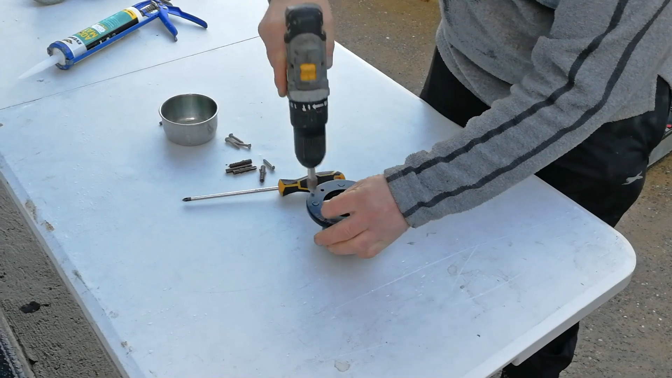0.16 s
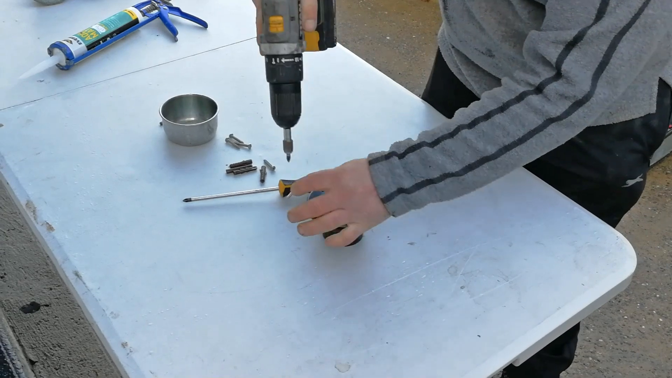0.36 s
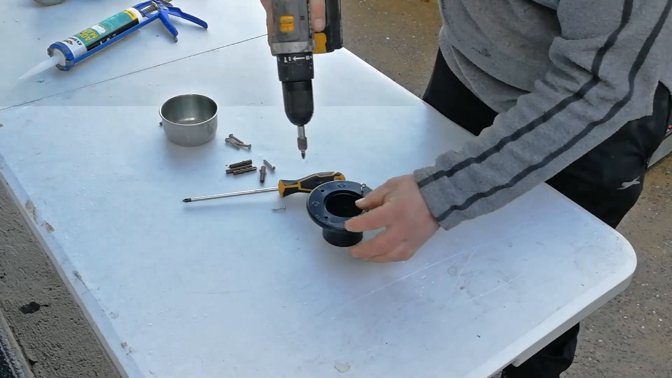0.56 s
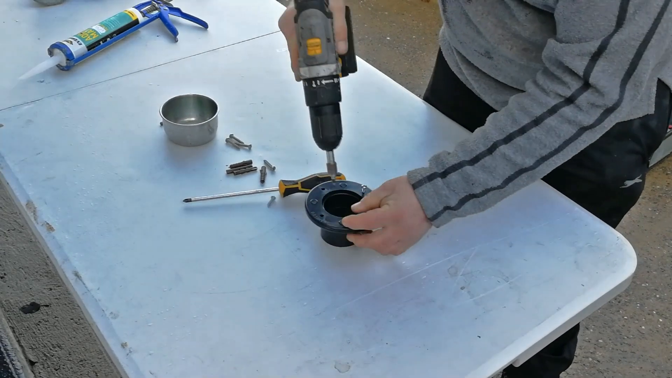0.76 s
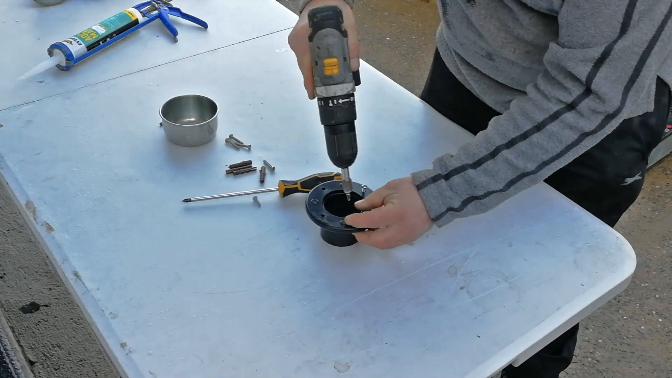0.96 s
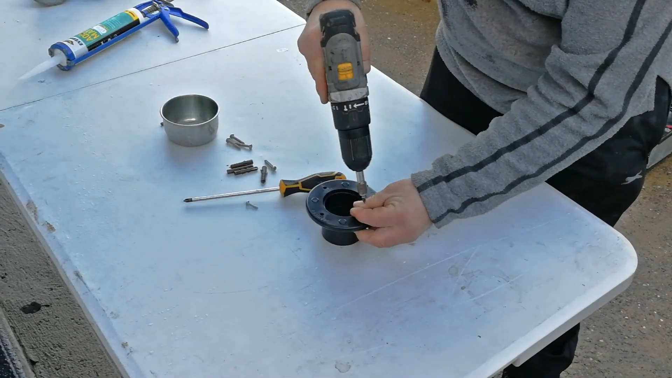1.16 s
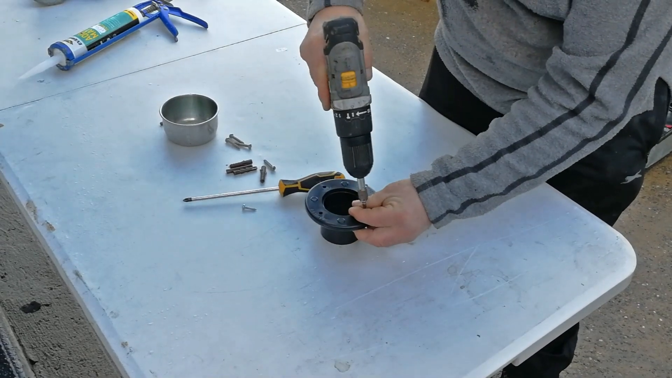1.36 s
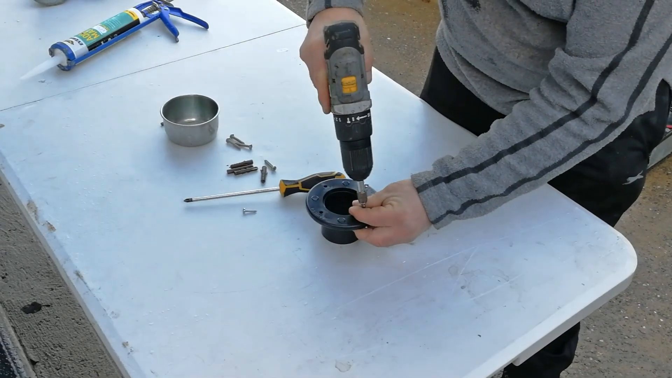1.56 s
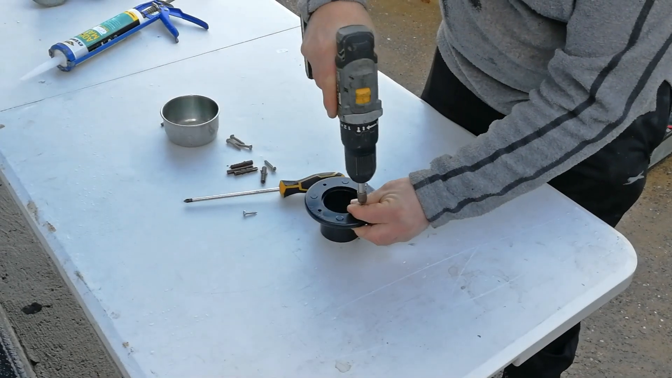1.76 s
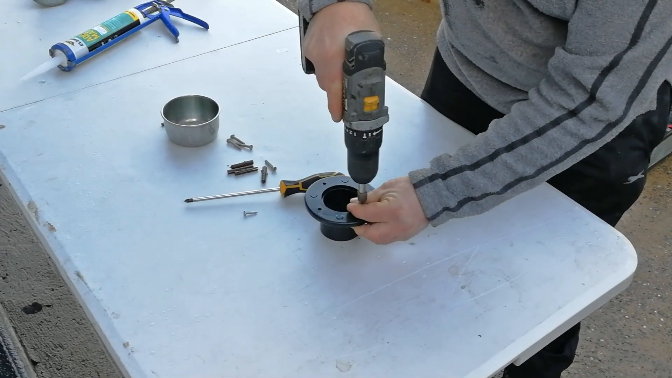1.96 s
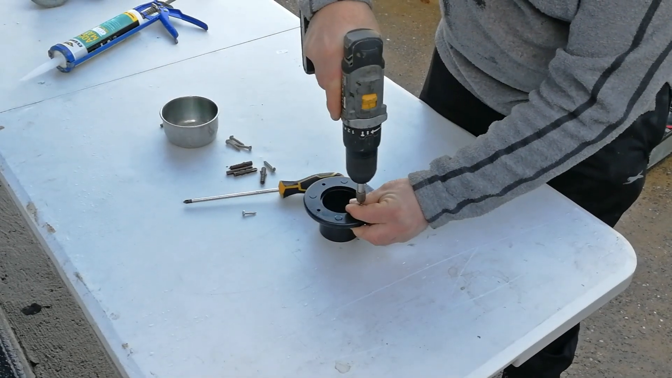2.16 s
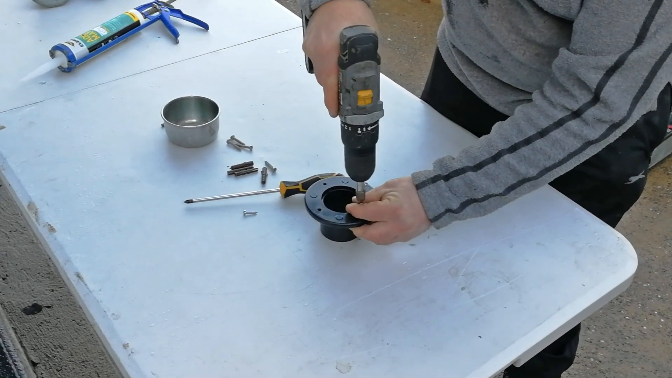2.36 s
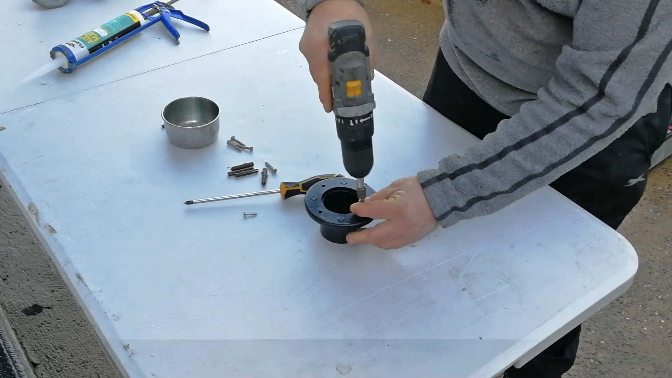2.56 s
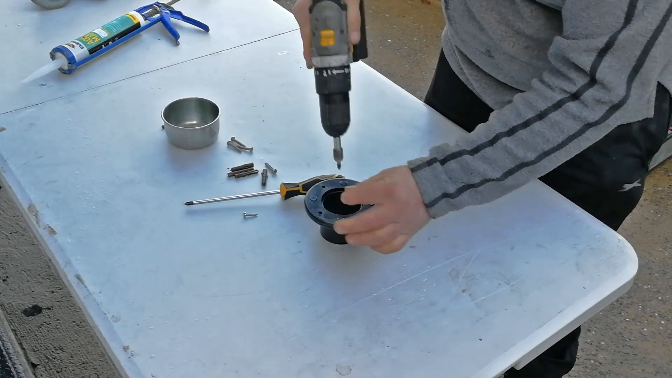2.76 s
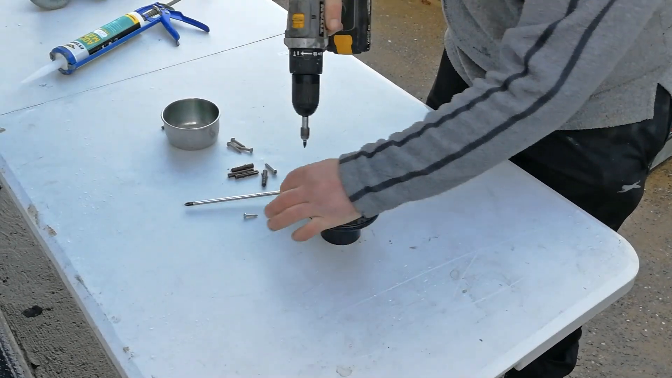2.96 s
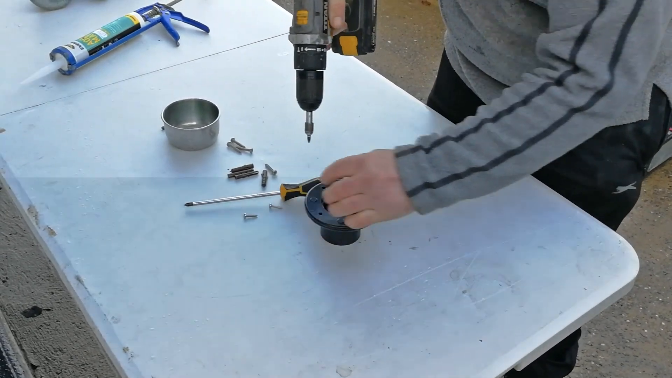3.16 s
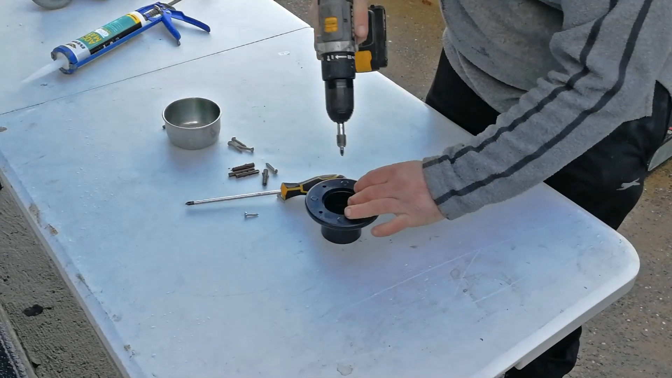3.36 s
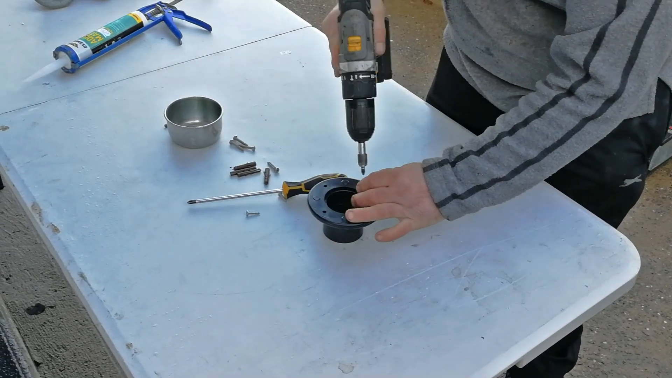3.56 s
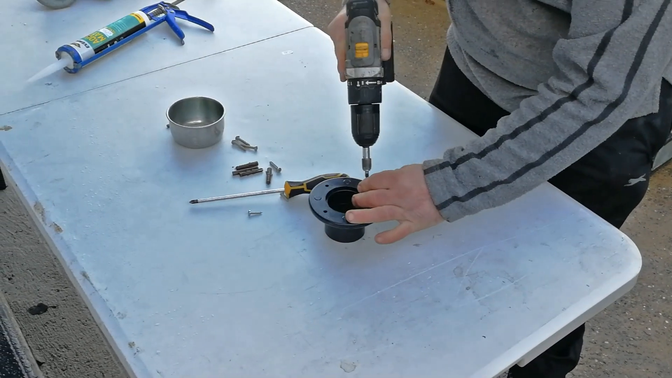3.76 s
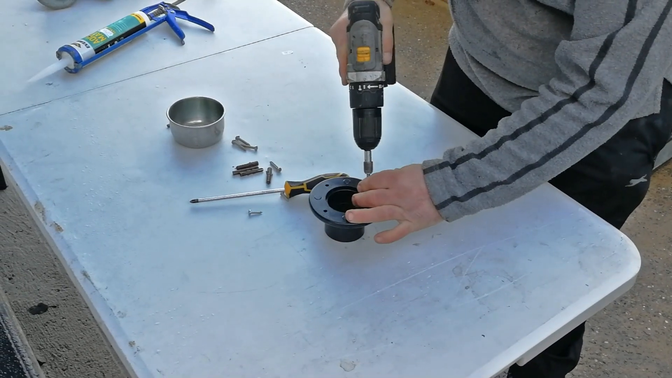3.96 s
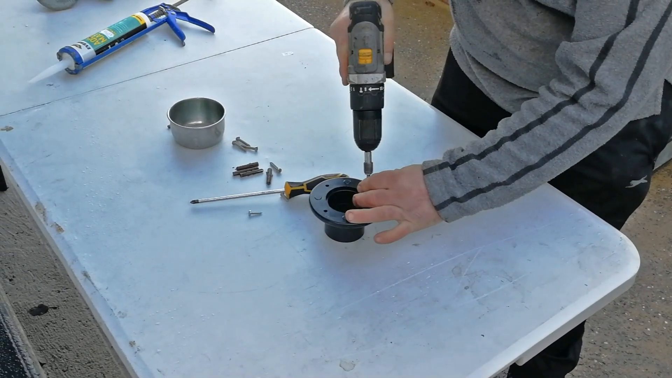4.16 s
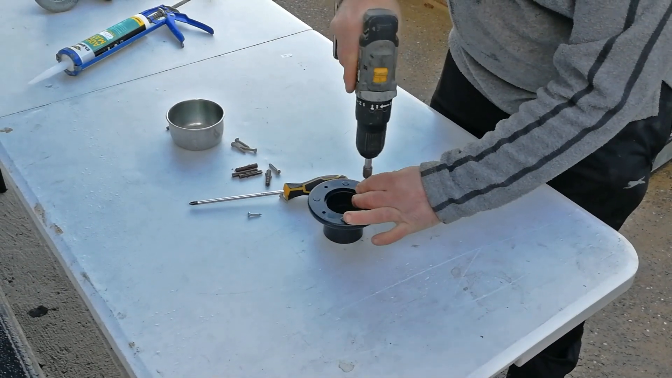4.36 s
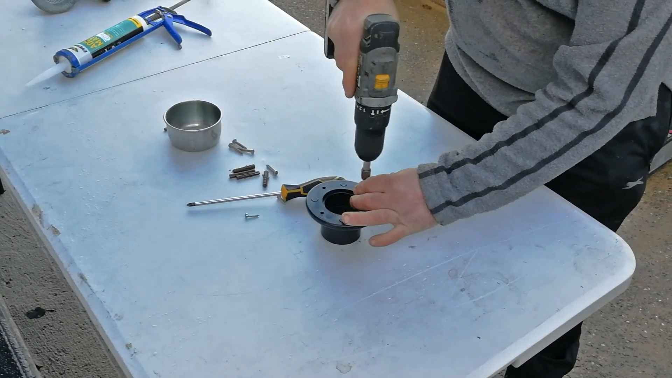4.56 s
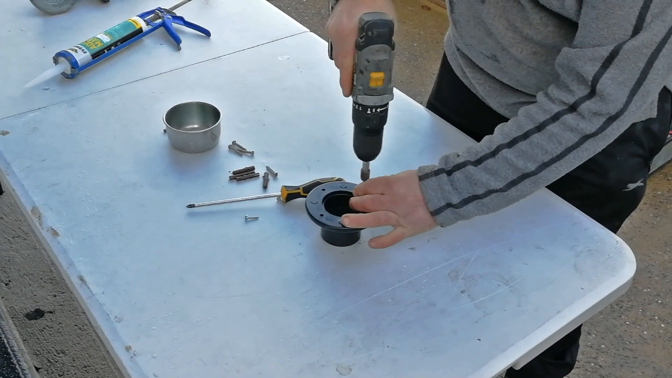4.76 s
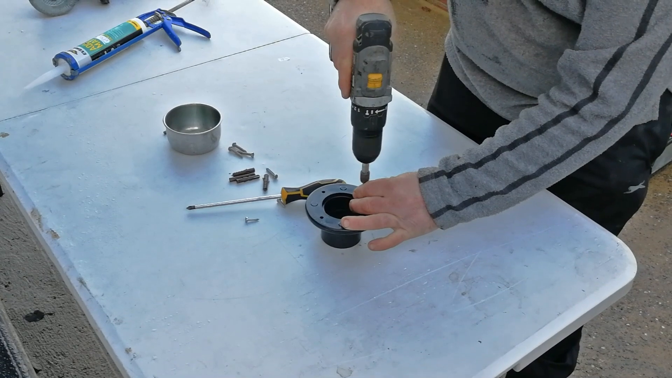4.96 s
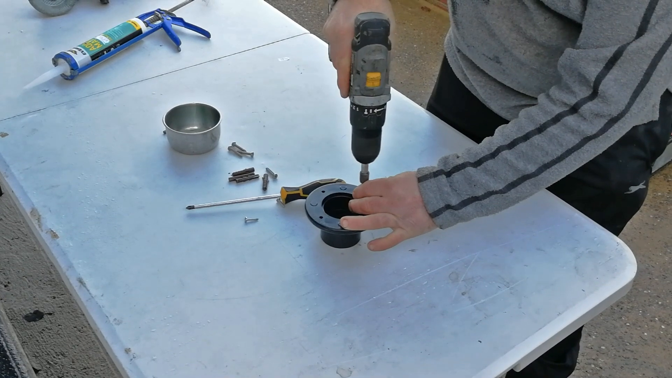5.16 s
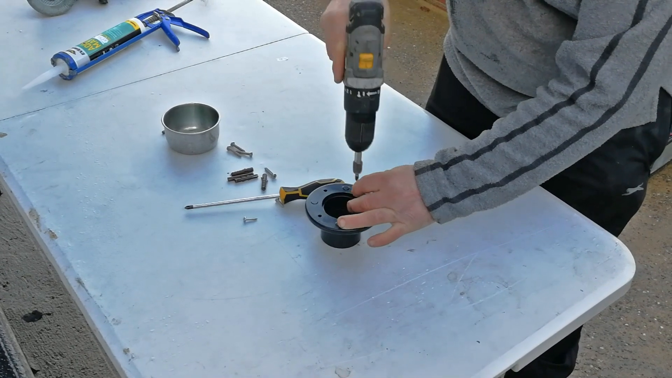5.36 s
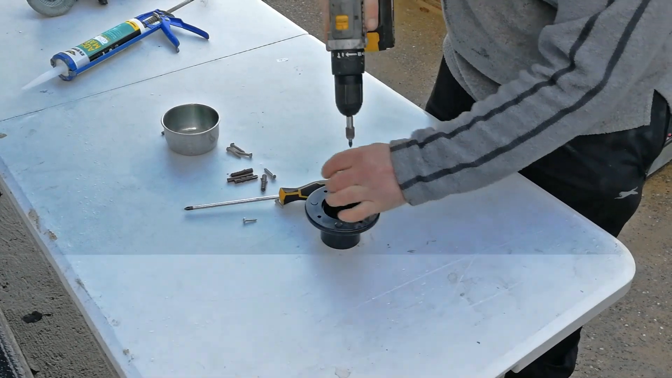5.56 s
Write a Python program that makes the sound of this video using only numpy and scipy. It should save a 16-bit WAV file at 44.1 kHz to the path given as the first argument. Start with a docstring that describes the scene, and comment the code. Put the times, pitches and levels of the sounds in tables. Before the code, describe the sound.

Close stereo recording at a plastic folding table outdoors. A cordless drill run ends with quick clunks, then a hard plastic fitting clacks and bounces. Steel ticks precede a rattling, whining drill burst of under a second. More plastic clacks follow, then bit taps with hollow table thumps and a second burst, stopping with clunks over faint distant traffic.

```python
"""A cordless drill-driver backs screws out of a plastic fitting on a folding plastic table, outdoors.
Drill: noise modulated by gear contact excites the housing, and shaft orders whine above until the trigger is let go.
The clunks, bit and fitting are decaying noise bursts coloured by resonances; scuffs are swelling noise bands.
The hollow table top booms as a sum of damped modes. Late reflections of the yard follow the blows and the drill;
behind all lies the filtered noise of distant traffic and open air."""
import sys
import numpy as np
from scipy import signal
from scipy.fft import rfft, irfft
from scipy.io import wavfile
from scipy.ndimage import uniform_filter1d

SR = 44100
rng = np.random.default_rng(int(sys.argv[2]) if len(sys.argv) > 2 else 0)


def to_wav(sig):
    """Store sig (one row per channel, or 1-D mono) as 16-bit WAV at the path in sys.argv[1].

    Samples outside -1..1 are clipped; the rate is SR.
    """
    pcm = np.clip(np.atleast_2d(sig), -1, 1) * 32767
    pcm = np.round(pcm).astype(np.int16)
    wavfile.write(sys.argv[1], SR, pcm.T)  # frames by channels


N = 246959
T = np.arange(N) / SR  # time [s]

# Pulls of the trigger: (pull time [s], let-go time [s], time the screw comes free [s], level [dB],
# level change once free [dB], gear-mesh whine offset [dB], upper whine offset [dB])
TRIGGER_PULLS = [(-.6, .062, -.3, -32.5, -3.5, 6, -3), (1.718, 2.547, 2.32, -32.2, -4.4, 4, .5),
                 (4.386, 5.26, 5.02, -32.2, -3, -1, 4.5)]
# Lines of motor and gears: (multiple of motor speed [-], relative left level [dB], relative right level [dB])
SHAFT_ORDERS = [(4, -16, -14), (5, -9, -10), (6, -23, -13), (15, -7, -15), (19, -24, -20), (20, -17, -29),
                (21, -18.5, -21), (25, -15, -24), (26, -17.5, -31), (28, -20.5, -30), (30, -29, -40),
                (31, -25, -40), (33, -19.5, -35), (35, -15, -33), (36, -15.5, -37), (37, -25, -40),
                (41, -24.5, -27)]
# Hum of the motor under spin-up torque: (multiple of motor speed [-], relative level [dB])
MOTOR_HUM = [(1, -9.5), (2, -17)]
# Spectrum of the drill housing: (frequency [Hz], left level [dB], right level [dB])
HOUSING_SPECTRUM = [(150, -28, -15), (384, -17.5, -14), (726, -16, -39.5), (1074, -2.5, 0),
                    (1410, 2.5, -1.5), (1904, -10.5, 6), (2340, -5, -7), (3510, -6.5, -12),
                    (4220, -13, -19.5), (5900, -5.5, -25), (7480, -14.5, -13), (9500, -15.5, -25),
                    (12500, -19.5, -32.5), (15800, -21, -45)]
# Clunks of the spindle lock and gears: as the motor brakes, and once as the gears take up their play:
# (time [s], level [dB], ring t60 [s], relative tick level [dB])
LOCK_CLUNKS = [(.080, -34, 0.017, -8), (.1040, -29, 0.023, -24), (.1200, -35, .02, -3),
               (1.7650, -40, .02, -18), (2.5649, -30, .02, -23), (2.5941, -28.5, 0.029, -27),
               (2.6100, -40, .02, 4), (5.2806, -28.5, 0.034, -8), (5.3062, -34.5, 0.029, -20),
               (5.3207, -33, .028, -8)]
# Steel bit meeting a screw head: (time [s], level [dB], ring t60 [s])
BIT_TICKS = [(1.3595, -26, 0.011), (1.3923, -42, .012), (1.4030, -40, .01), (1.4170, -44, .01),
             (1.7272, -43.5, 0.018), (1.837, -26, 0.014), (3.42, -58, .02), (3.8932, -31.5, .014),
             (3.9589, -35, 0.015), (4.2868, -27.5, 0.018), (4.295, -39, 0.027), (4.3910, -51, .015)]
# Spectrum of the bit's ring: (frequency [Hz], left level [dB], right level [dB])
BIT_SPECTRUM = [(400, -8, 1.5), (1000, 1, -11), (2000, -7, 2), (4300, -12, -32), (6000, -2, -13),
                (7300, 1, 0), (9500, -5.5, -8), (11500, -8, -32), (16000, -16, -16)]
# Hard plastic clacks and bounces: (time [s], level [dB], ring t60 [s], treble raised and bass lowered by [dB])
PLASTIC_CLACKS = [(0.3999, -21, 0.032, -1), (0.4103, -20.5, 0.024, 2), (0.414, -28, .025, 8),
                  (0.4863, -27.5, 0.05, 0), (0.4953, -30, 0.019, 9), (.509, -33.5, 0.033, -1),
                  (0.5298, -30.5, 0.013, 1), (.6675, -40.5, 0.035, 0.5), (0.828, -51.5, .03, -4),
                  (3.0106, -19, 0.022, 2.5), (3.0170, -24.5, 0.03, -7.5), (3.0194, -21, 0.031, 3.5),
                  (3.0985, -23, 0.034, -3), (3.1283, -33.5, 0.051, -3.5)]
# Spectrum of the fitting's ring: (frequency [Hz], left level [dB], right level [dB])
FITTING_SPECTRUM = [(200, -44, -29.5), (475, -20, -24.5), (850, -5, -14), (1450, -10, -10.5),
                    (1910, -13.5, -4), (2400, -10, -11), (3110, -1, -8.5), (4000, -6.5, -17),
                    (4930, -4.5, -12), (6280, -13.5, -22), (8480, -12, -20.5), (10300, -23.5, -33),
                    (16000, -29, -35)]
# Fitting scuffing the table, bit rasping in a screw head: (time [s], level [dB], length [s], centre [Hz])
SCUFF_SLIDES = [(.022, -46, 0.061, 446), (.41, -47, 0.062, 3600), (0.52, -51, 0.042, 3200),
                (1.654, -64, 0.15, 8900), (1.824, -30.5, 0.021, 1100), (1.82, -43, .09, 3000),
                (3.303, -58.5, .02, 3800), (3.318, -52.5, 0.044, 3100), (3.896, -46.5, 0.024, 3000),
                (4.285, -38, 0.074, 372), (4.295, -38, 0.053, 2140), (4.468, -33, 0.032, 520),
                (4.462, -40, .08, 2400)]
# Weight of the drill landing on the table: (time [s], relative level [dB], push length [s])
TABLE_THUMPS = [(0.026, -30, 0.0022), (1.362, -29, 0.0045), (1.829, -25, 0.0024), (3.8935, -24.5, 0.0037),
                (4.2886, -17.5, 0.0043), (4.2952, -27, 0.0028), (4.309, -21.5, 0.0029),
                (4.471, -21.5, 0.0023)]
# Screw thread catching and juddering the table: (time [s], relative level [dB], t60 [s])
THREAD_CATCHES = [(1.835, -34.5, 0.24), (1.985, -33.5, 0.21), (2.26, -39, .1), (2.335, -36.5, .13),
                  (2.39, -40.5, 0.21), (4.485, -32, 0.32), (4.762, -34, 0.43), (4.835, -37, 0.31),
                  (4.925, -35, 0.38), (5.073, -32.5, 0.29)]
# Modes of the hollow table top: (frequency [Hz], level [dB], t60 [s])
TABLE_MODES = [(117, -27, .15), (147, -3, 0.17), (206, -10, 0.11), (252.8, -10, 0.084), (304.4, -14, 0.12),
               (354, -19, 0.13), (420, -13, 0.085), (593, -19, 0.081), (654, -14, .07)]
# Spectrum of distant traffic and open air: (frequency [Hz], left level [dB], right level [dB])
AIR_SPECTRUM = [(19.8, -10.5, -9.5), (48, 0.5, 0.5), (85, -5, -4.5), (130, -5.5, -5), (219, -6.5, -6.5),
                (330, -19, -9.5), (520, -23.5, -19), (1020, -9, -15), (1940, -19.5, -15.5),
                (2760, -24.5, -31.5), (4520, -32.5, -37.5), (7000, -40, -42), (15500, -46.5, -47.5)]

FULL_SPEED_HZ, SPIN_UP_S = 353, .076  # motor turns per second; time constant of the climb
ENGAGE_S = 0.047  # the gears take up their play this long after the pull
BITE_S, IDLE_DB = 0.068, -11  # the gears start this much quieter and swell until the bit bites
BRAKE_HZ_PER_S, STOP_S = 750, 0.037  # fall of speed and Gaussian time scale of the fade after letting go
FREE_S = 0.14  # the load fades over this time as the screw leaves its thread
SPEED_DB_PER_OCTAVE = 5.5  # the gearbox is louder the faster it turns
SLOW_TILT_DB, LOAD_TILT_DB = 11, 1.5  # treble tilt at standstill, gone at full speed; tilt under full load
MESH_ORDER, UPPER_ORDER = 15, 25  # orders whose level is set for each pull
WHINE_SPEED_POWER, FREE_WHINE_DB = 9.6, -2  # growth of the whine with speed; its further drop without load
CATCH_ATTACK_S, CATCH_TOP_HZ = 0.011, 473  # a catch builds up softly, so it is dull
AIR_DB, AIR_DB_PER_S = -48, -0.46  # the far traffic slowly recedes
TOP_HZ = 16000


def drill(rattle=0.29, planet_depth=0.095, planet_ratio=.23, flutter_db=0.72, waver_db=3, wobble=.0012,
          churn_db=-1):
    """Amplitude modulation and harmonic orders: tooth contact rattles the housing, shaft multiples whine."""
    hz, load, gain, mesh_db, upper_db = trigger()
    speed = hz / FULL_SPEED_HZ
    turn = 2 * np.pi * np.cumsum(hz * (1 + wobble * walk(70))) / SR  # shaft angle [rad]

    # tooth play opens and closes with the motor shaft and with the slower planet carrier
    shaft_play = 1 + rattle * np.cos(turn)
    planet_play = 1 + planet_depth * np.cos(planet_ratio * turn)
    contact = shaft_play * planet_play * undb(flutter_db * walk(60))
    churn = unit(colour(pair(2300) * contact, HOUSING_SPECTRUM))
    tilt_db = SLOW_TILT_DB * (1 - speed) + LOAD_TILT_DB * load
    churn = undb(churn_db) * brighten(churn, tilt_db)

    whine = np.zeros((2, N))
    run_db = {MESH_ORDER: mesh_db, UPPER_ORDER: upper_db}
    for order, *ears_db in SHAFT_ORDERS:
        # the hand-held tool sways, so each line swells differently at each ear
        depth_db = waver_db / 2 if order == MESH_ORDER else waver_db
        sway_db = depth_db * np.array([walk(22.05), walk(21.83)])
        line_db = np.array(ears_db)[:, None] + sway_db + run_db.get(order, 0)
        phase = order * turn + 0.31 * walk(150) + rng.uniform(0, 2 * np.pi)
        ear_lag = np.array([[0], [order * 0.088]])  # [rad]
        whine += undb(line_db) * np.sqrt(2) * np.sin(phase - ear_lag)
    # the whine grows steeply with speed and eases without load
    whine *= speed ** WHINE_SPEED_POWER * undb(FREE_WHINE_DB * (1 - load))

    hum = np.zeros(N)
    for order, db in MOTOR_HUM:
        hum += undb(db + waver_db * walk(21.93)) * np.sqrt(2) * np.sin(order * turn)
    hum *= np.sqrt(1 - speed) * load
    return gain * (churn + whine + hum)


def trigger():
    """Piecewise control: speed, load, gain and two whine levels, each pull replacing the one before."""
    controls = np.zeros((5, N))
    for pull, let_go, free, db, free_db, mesh_db, upper_db in TRIGGER_PULLS:
        hz, load, gain = motor(pull, let_go, free, free_db)
        run = np.broadcast_arrays(hz, load, gain * undb(db), mesh_db, upper_db)
        controls = np.where(T >= pull, run, controls)
    return controls


def motor(pull, let_go, free, free_db):
    """First-order spin-up and linear braking: speed [Hz], load 0-1 and gain, unloading as the screw frees."""
    braking = np.maximum(T - let_go, 0)
    climb = 1 - np.exp(-np.maximum(T - pull, 0) / SPIN_UP_S)
    hz = np.maximum(FULL_SPEED_HZ * climb - BRAKE_HZ_PER_S * braking, 1)
    load = 1 - rise(free - FREE_S / 2, FREE_S)
    engaged = pull + ENGAGE_S
    speed_db = SPEED_DB_PER_OCTAVE * np.log2(hz / FULL_SPEED_HZ)
    bite_db = IDLE_DB * (1 - rise(engaged, BITE_S))
    stop = np.exp(-(braking / STOP_S) ** 2)
    return hz, load, (T >= engaged) * undb(speed_db + bite_db + free_db * (1 - load)) * stop


def clunks(ring_hz=1650, width_hz=1300):
    """Impact excitation: spindle lock and gears knock the housing's main resonance, with bright steel ticks."""
    knocks = sum(undb(db) * decay(s, t60) for s, db, t60, _ in LOCK_CLUNKS)
    ticks = sum(undb(db + tick_db) * decay(s, t60) for s, db, t60, tick_db in LOCK_CLUNKS)
    # two equal resonances in series
    ring = band(band(pair(3400), ring_hz, width_hz), ring_hz, width_hz)
    steel = colour(ticks * pair(2000), HOUSING_SPECTRUM[:1] + BIT_SPECTRUM[1:])
    return knocks * unit(ring) + steel


def bit():
    """Impact of steel on steel: very short, bright decaying ticks."""
    blows = sum(undb(db) * decay(s, t60) for s, db, t60 in BIT_TICKS)
    return colour(pair(3000) * blows, BIT_SPECTRUM)


def fitting():
    """Modal density: each clack rings the stiff plastic's dense, short modes, heard as coloured noise."""
    noise = pair(2200)
    blows = np.zeros((2, N))
    for s, db, t60, tilt_db in PLASTIC_CLACKS:
        blows += brighten(noise * undb(db) * decay(s, t60), tilt_db)
    return colour(blows, FITTING_SPECTRUM)


def scuffs(grain_db=3, width=0.44):
    """Sliding friction: short grainy bands of noise swell quickly and fade; width is relative to centre."""
    noise = pair(2100) * undb(grain_db * walk(500))
    out = np.zeros((2, N))
    for s, db, length, hz in SCUFF_SLIDES:
        out += undb(db) * swell(s, length) * unit(band(noise, hz, width * hz))
    return out


def table_top(shake_db=2, thump_db=1, leak_hz=95):
    """Modal superposition: pushes and the grinding screw ring the hollow top; deep bass leaks round its edges."""
    t = T[:SR // 2]
    ring = sum(undb(db) * np.sin(2 * np.pi * hz * t) * np.exp(-np.log(1000) * t / t60)
               for hz, db, t60 in TABLE_MODES)
    pushes = np.zeros(N)
    for s, db, length in TABLE_THUMPS:
        push = swell(s, length)
        pushes -= undb(db + thump_db) * push / push.sum()
    thumps = signal.fftconvolve(pushes, ring)[:N]

    grind = signal.fftconvolve(rng.standard_normal(N), ring)[:N]
    grind = signal.sosfilt(signal.butter(1, CATCH_TOP_HZ, fs=SR, output="sos"), grind)
    shake = sum(undb(db + shake_db) * rise(s, CATCH_ATTACK_S) * decay(s, t60) for s, db, t60 in THREAD_CATCHES)
    top = thumps + shake * grind / np.std(grind)
    return signal.sosfilt(signal.butter(2, leak_hz, "high", fs=SR, output="sos"), top)


def open_air(swell_db=-0.13, gust_db=1.5):
    """Stationary noise with a fluctuating bass: far traffic hums while the lowest rumble comes and goes."""
    air = unit(colour(pair(1000), AIR_SPECTRUM))
    rumble = signal.sosfilt(signal.butter(1, 120, fs=SR, output="sos"), air)
    air = air + rumble * (undb(gust_db * walk(6)) - 1)
    return air * undb(AIR_DB + AIR_DB_PER_S * T + swell_db * walk(3.24))


def yard(x, t60, wet_db, dull_hz=6000, delay_s=.007):
    """Late reflection by convolution: nearby walls and the ground return a short, duller tail."""
    size = SR // 2
    tail = rng.standard_normal((2, size)) * decay(delay_s, t60)[:size]
    tail = signal.sosfilt(signal.butter(1, dull_hz, fs=SR, output="sos"), tail)
    tail /= np.sqrt(np.sum(tail ** 2) / 2)
    return x + undb(wet_db) * signal.fftconvolve(x, tail, axes=1)[:, :N]


def undb(db):
    """Logarithmic level: decibels to gain."""
    return 10 ** (np.asarray(db) / 20)


def unit(x):
    """Normalisation: scale a stereo pair so that its middle has standard deviation 1."""
    return x / np.std(x.mean(axis=0))


def walk(rate):
    """Smoothed random process: levels held 1 / rate s and slewed twice; spread near 1."""
    k = max(int(SR / rate), 1)
    held = np.repeat(rng.standard_normal(N // k + 1), k)
    return 1.42 * uniform_filter1d(uniform_filter1d(held, k), k)[:N]


def colour(x, points):
    """Minimum-phase filtering: a causal left and right spectrum, at unit mean power gain."""
    hz, *ears = np.transpose(points)
    size = 8192
    f = np.log(np.fft.rfftfreq(size, 1 / SR) + 1)
    cepstrum = irfft(np.log(undb([np.interp(f, np.log(hz), db) for db in ears])))
    # folding the cepstrum onto positive times makes the response causal
    cepstrum[:, 1:size // 2] *= 2
    cepstrum[:, size // 2 + 1:] = 0
    response = irfft(np.exp(rfft(cepstrum)))
    response /= np.sqrt(np.sum(response ** 2) / 2)
    return signal.fftconvolve(np.broadcast_to(x, (2, N)), response, axes=1)[:, :N]


def pair(alike_hz):
    """Interaural coherence: noise at two ears, alike in the bass, increasingly unrelated above alike_hz."""
    f = np.fft.rfftfreq(N, 1 / SR)
    alike = 1 / (1 + (f / alike_hz) ** 2)
    mid, side = rfft(rng.standard_normal((2, N)))
    common = mid * np.sqrt((1 + alike) / 2)
    opposed = np.array([[1], [-1]]) * side * np.sqrt((1 - alike) / 2)
    return irfft(common + opposed, N)


def band(x, hz, width_hz):
    """Second-order resonance with gain 1 at its centre."""
    return signal.lfilter(*signal.iirpeak(hz, hz / width_hz, fs=SR), x)


def brighten(x, db, split_hz=3500):
    """Spectral tilt: raise the treble and lower the bass by db about a split."""
    low = signal.sosfilt(signal.butter(1, split_hz, fs=SR, output="sos"), x)
    return low * undb(-db) + (x - low) * undb(db)


def decay(start, t60):
    """Exponential damping: the envelope of a blow that dies by 60 dB in t60."""
    return (T >= start) * np.exp(-np.log(1000) * np.maximum(T - start, 0) / t60)


def rise(start, attack_s):
    """Linear onset: a ramp from nothing to one."""
    return np.clip((T - start) / attack_s, 0, 1)


def swell(start, length):
    """Triangular force envelope: up in a quarter of its length, down in the rest."""
    return np.interp(T, [start, start + length / 4, start + length], [0, 1, 0])


def scene():
    """Superposition: drill and table close by, clacks carrying out into the yard, open air behind."""
    tool = yard(drill() + clunks() + bit(), t60=0.26, wet_db=-16.5)
    plastic = yard(fitting() + scuffs(), t60=0.3, wet_db=-12.5)
    return tool + plastic + table_top() + open_air()


def record(dry):
    """Band limiting: a steep elliptic low-pass cuts the top."""
    return signal.sosfilt(signal.ellip(10, .2, 70, TOP_HZ, fs=SR, output="sos"), dry)


dry = scene()
out = record(dry)
to_wav(out)
```